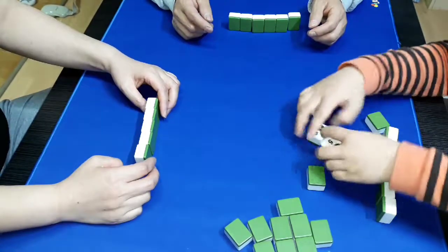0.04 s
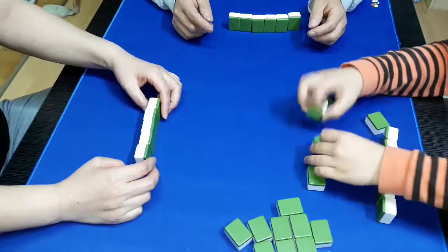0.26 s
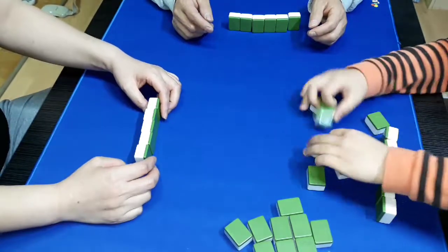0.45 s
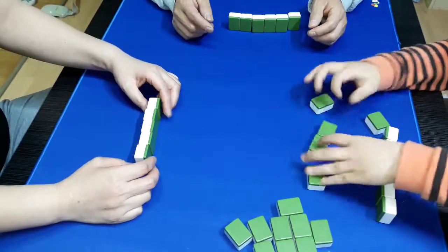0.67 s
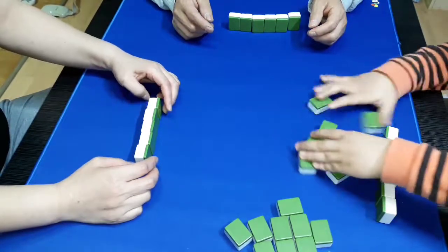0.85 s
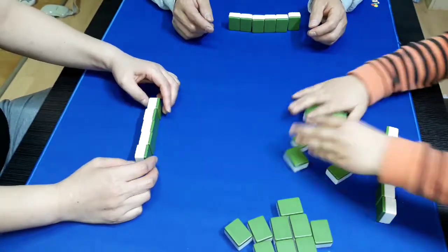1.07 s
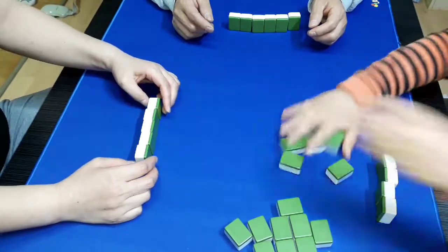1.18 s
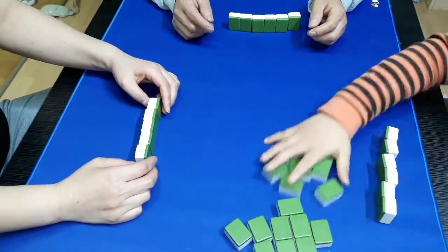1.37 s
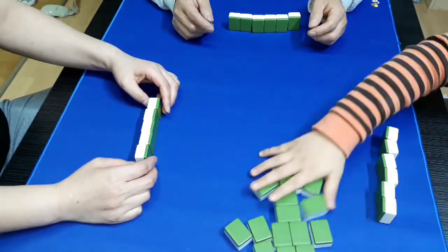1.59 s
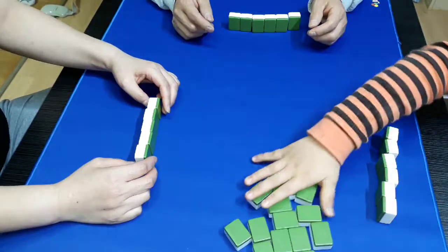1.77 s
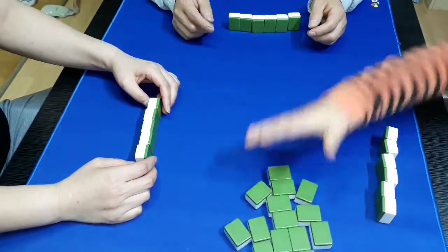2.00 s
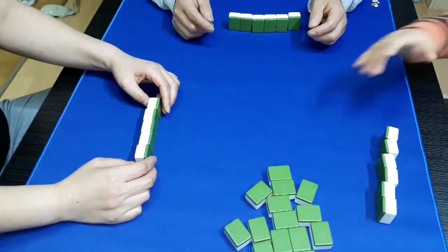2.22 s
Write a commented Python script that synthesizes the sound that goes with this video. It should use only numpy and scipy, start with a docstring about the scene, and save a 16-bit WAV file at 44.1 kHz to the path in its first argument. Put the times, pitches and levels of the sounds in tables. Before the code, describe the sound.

Hard game tiles clack together and land with dull thumps on a table mat, then are swept into a pile with a brief scraping rattle. Sliding hands add a soft rumble, heard close in a small, faintly humming room.

```python
"""Hard game tiles clack and thump as they are turned over, pushed together and swept across a table.
Tiles ring briefly when they hit each other and land with a dull thump on the mat that covers the top.
Sliding hands make the table rumble and the cloth hiss, and the swept pile scrapes and rattles.
The small room hums faintly and adds a short echo to each hit."""
import sys
import numpy as np
from scipy import signal
from scipy.fft import rfft, irfft
from scipy.io import wavfile
from scipy.ndimage import uniform_filter1d

SR = 44100
rng = np.random.default_rng(int(sys.argv[2]) if len(sys.argv) > 2 else 0)


def bounce(signal):
    """Save signal as a 16-bit WAV file at the path given by the first command-line argument."""
    frames = np.transpose(np.atleast_2d(signal))
    limited = np.clip(frames, -1, 1)
    pcm = np.round(limited * 32767).astype(np.int16)
    wavfile.write(sys.argv[1], SR, pcm)


N = 99225
TIME = np.arange(N) / SR

# The tones a tile rings with. Each row: pitch in Hz, level in dB, seconds to fade by 60 dB (called t60).
TILE_TONES = [(1750, -18.5, .005), (2200, -7.5, .009), (2850, -1.5, 0.0048), (3480, -5, .005),
              (4362, 3.5, 0.0093), (4554, 0, 0.011), (4970, -6.5, 0.0068), (6180, -5.5, 0.0027),
              (7000, -10.5, .007), (8450, -5.5, 0.0075)]


def from_db(db):
    """Turn decibels into a number to multiply by."""
    return 10 ** (np.asarray(db) / 20)


def same_energy(x, model):
    """Scale x to carry as much energy as model."""
    return x * np.sqrt(np.sum(model ** 2) / (np.sum(x ** 2) + 1e-20))


def at_hz(points, hz):
    """Read between the rows of a table, giving each octave equal space."""
    f, value = np.transpose(points)
    return np.interp(np.log(np.maximum(hz, 1)), np.log(f), value)


def level_curve(points):
    """Loudness over time, from rows of seconds and dB."""
    return from_db(np.interp(TIME, *np.transpose(points)))


def filtered(x, hz, kind, order=2):
    """Keep the lows, the highs or a band; a higher order cuts more steeply."""
    return signal.sosfilt(signal.butter(order, hz, kind, fs=SR, output="sos"), x)


def dying(t, t60):
    """A fade that is 60 dB down after t60 seconds."""
    return np.exp(-np.log(1000) * t / t60)


def noise(colour):
    """Steady noise with average power 1, shaped by rows of Hz and dB."""
    gains = from_db(at_hz(colour, np.fft.rfftfreq(N, 1 / SR)))
    x = irfft(rfft(rng.standard_normal(N)) * gains, N)
    return x / np.sqrt(np.mean(x ** 2) + 1e-20)


def burst(t, band_hz, t60, order=2):
    """A short, fading puff of noise within a band."""
    return filtered(rng.standard_normal(len(t)) * dying(t, t60), band_hz, "band", order)


def pulse(t, hz):
    """One push and rebound, strongest around hz; it peaks after 1 / hz seconds."""
    u = (np.pi * (hz * t - 1)) ** 2
    return (1 - 2 * u) * np.exp(-u)


def ring(t, tones, detune, uneven_db):
    """A struck object rings with fading tones, whose tuning and strength can vary from hit to hit."""
    out = 0
    for k, (hz, db, t60) in enumerate(tones):
        tuning, strength = rng.standard_normal(2)
        wave = np.sin(2 * np.pi * hz * (1 + detune * tuning) * t)
        out = out + (-1) ** k * from_db(db + uneven_db * strength) * wave * dying(t, t60)
    return out / np.abs(out).max()


def in_room(hit, room_db):
    """The room follows a hit with a few quick echoes and a soft tail, different for each spot."""
    # Echoes off nearby surfaces. Each row: delay in seconds, level in dB.
    echoes = [(.0062, -14), (0.0116, -24), (0.0215, -27)]
    # How long the room rings. Each row: frequency in Hz, seconds to fade by 60 dB.
    fade_times = [(150, 0.42), (400, 0.29), (1000, 0.42), (2800, 0.29), (7000, 0.29), (12000, 0.24)]
    # The tone of the tail. Each row: frequency in Hz, level in dB.
    colour = [(100, 0), (400, -2.5), (1000, -3.5), (2500, 2), (4500, -2.5), (8000, -1.5), (11000, -3.5),
              (15000, 3.5)]
    t, build_s = TIME[:2 ** 15], 0.0067
    hz = np.fft.rfftfreq(len(t), 1 / SR)
    spectrum = rfft(rng.standard_normal(len(t))) * from_db(at_hz(colour, hz))
    centres, tail = [f for f, _ in fade_times], 0
    for share, (_, t60) in zip(np.eye(len(centres)), fade_times):
        band = irfft(spectrum * at_hz(list(zip(centres, share)), hz), len(t))
        tail = tail + band * dying(t, t60)
    tail = tail * (1 - np.exp(-t / build_s))
    response = tail / np.sqrt(np.sum(tail ** 2))
    for delay_s, db in echoes:
        response[int(delay_s * SR)] += from_db(db)
    direct = t == 0
    return signal.fftconvolve(hit, direct + from_db(room_db) * response)


def add(track, s, sound):
    """Mix a sound in, starting at s seconds."""
    i = max(int(s * SR), 0)
    track[i:i + len(sound)] += sound[:max(N - i, 0)]


def room_hum():
    """The room hums with a faint, steady, low noise."""
    # The tone of the hum. Each row: frequency in Hz, level in dB.
    colour = [(25, -24.5), (50, -20), (100, -2.5), (155, 3), (230, 1), (400, -5), (600, -11.5), (780, -8.5),
              (1100, -28), (2000, -36), (4000, -39.5), (10000, -41.5), (15500, -39.5)]
    return from_db(-55) * noise(colour)


def cloth_hiss():
    """The cloth hisses softly as hands slide over it."""
    # How loud the hiss is. Each row: time in seconds, level in dB.
    levels = [(0, -101), (.2, -92), (.28, -69.5), (.65, -64.5), (.85, -73.5), (1.6, -60.5), (1.7, -72),
              (1.95, -71.5), (2.05, -75.5), (2.25, -74.5)]
    # The tone of the hiss. Each row: frequency in Hz, level in dB.
    colour = [(1000, 12), (3000, 1), (5500, 4.5), (7000, 3), (8300, 10), (9800, -20.5), (15000, -17.5)]
    return level_curve(levels) * noise(colour)


def table_rumble():
    """Each slide of a hand makes a rumble swell and fade around the table's lowest tone."""
    # Hand slides. Each row: peak time in seconds, level in dB, rise in seconds, fall in seconds.
    slides = [(0.559, -46, 0.035, 0.035), (.67, -42, 0.035, 0.093), (.76, -50.5, 0.025, 0.043),
              (.955, -40.5, 0.025, 0.056), (1.15, -52, 0.019, 0.064), (1.385, -47, 0.037, 0.047),
              (1.89, -43.5, 0.037, 0.067), (2.061, -47, .025, .05)]
    # The tone of the rumble. Each row: frequency in Hz, level in dB.
    colour = [(40, -33.5), (90, -21.5), (130, -1), (160, 5.5), (200, -5), (280, -13), (500, -28.5),
              (1000, -51.5), (4000, -60)]
    power = 0
    for s, db, rise_s, fall_s in slides:
        age = TIME - s
        swell = np.exp(-np.where(age < 0, (age / rise_s) ** 2 / 2, age / fall_s))
        power = power + (from_db(db) * swell) ** 2
    friction = noise(colour)
    wobble = np.sqrt(uniform_filter1d(friction ** 2, size=1500) + 1e-6)
    return np.sqrt(power) * friction / wobble   # dividing evens out the noise's own ups and downs


def swept_pile():
    """Swept tiles scrape over the mat and jostle with many small ticks."""
    # How hard the pile is swept. Each row: time in seconds, level in dB.
    sweep = [(1.28, -78), (1.34, -47), (1.40, -37.5), (1.47, -38.5), (1.56, -70), (1.63, -32.5),
             (1.67, -54), (1.76, -58), (1.86, -89.5)]
    # The tone of the scrape. Each row: frequency in Hz, level in dB.
    colour = [(100, -13.5), (300, -2.5), (540, 18.5), (800, -15), (1300, 6.5), (2000, -6.5), (3800, 8),
              (6000, -38.5), (12000, -36)]
    ticks_per_s, tile_count = 220, 6
    ticks, t = np.zeros(N), TIME[:SR // 50]
    scrape = from_db(-11.5) * noise(colour)
    bumps = (rng.random(N) < ticks_per_s / SR) * rng.standard_normal(N)
    which_tile = rng.integers(0, tile_count, N)
    for k in range(tile_count):
        tile = ring(t, TILE_TONES, detune=.06, uneven_db=3)
        ticks += signal.fftconvolve(bumps * (which_tile == k), tile)[:N]
    rattle = from_db(-26) * filtered(ticks, 3500, "low")
    started = TIME > sweep[0][0]
    return level_curve(sweep) * started * (scrape + rattle)


def pile_slap():
    """A tile slaps flat into the packed pile, which rings lower, as one heavier body."""
    # The slap. Each row: start in seconds, level in dB, room echo in dB.
    slaps = [(1.511, -11, -2)]
    # The pile's tones. Each row: pitch in Hz, level in dB, seconds to fade by 60 dB.
    pile_tones = [(984, -6, 0.035), (1233, -0.5, 0.015), (2125, -7.5, 0.027), (2400, 1, 0.015),
                  (2663, -7.5, 0.02), (3373, -3, 0.02), (4370, 3.5, .012)]
    out, t = np.zeros(N), TIME[:SR // 12]
    rise = 1 - np.exp(-t / 0.0015)   # the blow spreads from tile to tile
    for s, db, room_db in slaps:
        pile = ring(t, pile_tones, detune=0, uneven_db=0)
        grit = from_db(-5) * same_energy(burst(t, band_hz=(630, 4480), t60=.025, order=3), pile)
        slap = same_energy((pile + grit) * rise, pile)
        add(out, s, from_db(db) * in_room(slap, room_db))
    return out


def mat_thumps():
    """The springy mat softens each landing to one push; the tile quivers and the table rings low."""
    # A tile or finger lands. Each row: peak time in seconds, level in dB, push pitch in Hz,
    # table ring in dB, quiver pitch in Hz, quiver in dB, room echo in dB.
    landings = [(0.211, -29, 220, -2, 203, -14, -9), (0.2185, -19, 614, -2, 790, 1, -2.5),
                (0.2263, -28, 395, -13, 360, 11.5, -7), (0.2384, -20.5, 364, -18, 366, -5, -0.5),
                (0.3514, -17, 605, -0.5, 175, -3, -3.5), (0.3687, -28, 417, 0, 293, 0.5, -12.5),
                (0.389, -23.5, 266, -24, 157, -1, 6.5), (0.4062, -15.5, 464, 1, 680, -2.5, -0.5),
                (0.4108, -20.5, 335, -8, 167, -1, -8), (.4137, -16.5, 504, -10, 410, -6, -11),
                (0.4181, -19, 454, -21, 290, -5, -2), (.431, -34.5, 385, -7, 460, -3, -1),
                (0.4866, -16.5, 562, 0.5, 700, -5, -4), (0.4909, -16.5, 550, -9, 303, -1.5, 1),
                (0.4984, -25.5, 362, -3.5, 185, -4.5, 1.5), (0.5545, -32.5, 432, 0, 195, -2, 1.5),
                (0.735, -35.5, 560, 2, 344, 3.5, 3.5), (1.5049, -30.5, 480, -7, 560, -10, -1.5),
                (1.515, -23, 605, -0.5, 214, -5.5, -0.5)]
    # The padded table's tones. Each row: pitch in Hz, level in dB, seconds to fade by 60 dB.
    table_tones = [(161.8, -13.5, 0.13), (259, -4.5, 0.077), (320, -7.5, 0.073), (410, 0.5, 0.12),
                   (607.5, -12, 0.05), (700, -3, 0.021), (844, -6.5, 0.036), (1624, -14, 0.011)]
    quiver_cycles, table_low_hz = 16, 69.6
    out, t = np.zeros(N), TIME[:SR // 5]
    for s, db, push_hz, ring_db, quiver_hz, quiver_db, room_db in landings:
        push = pulse(t, push_hz)
        top = from_db(ring_db) * same_energy(ring(t, table_tones, detune=0.018, uneven_db=2.5), push)
        crush = from_db(-10.5) * same_energy(burst(t, band_hz=(80, 1400), t60=0.014), push)
        quiver = np.sin(2 * np.pi * quiver_hz * t) * dying(t, quiver_cycles / quiver_hz)
        quiver = from_db(quiver_db) * same_energy(quiver, push)
        tap = from_db(-19.5) * same_energy(burst(t, band_hz=(870, 1470), t60=.007), push)
        tap *= (push_hz / 490) ** 2   # a quicker push taps louder
        pressed = 1 - np.exp(-(push_hz * t) ** 2)   # the ringing builds while the mat gives way
        body = filtered(push + pressed * (top + crush + quiver), table_low_hz, "high")
        add(out, s - 1 / push_hz, from_db(db) * in_room(body + tap, room_db))
    return out


def tile_clacks():
    """Tiles crack and ring as they meet, knock when pressed to the table and snap when edges touch."""
    # Tile hits tile. Each row: start in seconds, level in dB, treble limit in Hz,
    # low knock in dB, high snap in dB, room echo in dB.
    hits = [(0.351, -15.5, 9000, -0.5, -43.5, -6), (0.3555, -21, 8900, 4, -27, -1.5),
            (0.5092, -29, 7000, -32, -38, -2.5), (0.5289, -33.5, 9000, -15, -39, -19),
            (0.568, -43.5, 7000, -19, -27, -3.5), (0.7388, -42.5, 7000, -5, -40, -3.5),
            (0.798, -30.5, 9000, -20.5, -41, 0), (.909, -16, 7500, -25.5, -42.5, 2.5),
            (0.9269, -25.5, 7000, -15.5, -27, -1), (0.9433, -22.5, 7000, -16, -32, -9),
            (1.036, -26, 7000, -36, -34.5, -4), (1.099, -35, 4500, -29, -35, -3.5),
            (1.1437, -10.5, 8450, -46.5, -29, -9), (1.1456, -14.5, 6040, -21.5, -32.5, 0.5),
            (1.171, -14.5, 7500, -17, -20.5, 1), (1.1729, -9, 7000, -32.5, -22.5, -2.5),
            (1.3227, -21, 7870, -19.5, -17.5, -17.5), (1.326, -22.5, 8000, -21, -15.5, -0.5),
            (1.371, -18.5, 8000, -14.5, -10.5, -8.5), (1.376, -19.5, 6500, -27, -19.5, -18),
            (1.3838, -26.5, 5500, -7, -16.5, -17), (1.3914, -19, 5500, -13, -32, -1),
            (1.4309, -22, 7000, -10.5, -16, -4), (1.435, -19, 3700, -17.5, -34, -7),
            (1.4572, -46.5, 4500, 9, -20, 5), (1.624, -27, 4970, -34, -22, -10),
            (1.633, -30, 4000, -8.5, -35, -1), (1.675, -42.5, 3500, -12, -28, -11),
            (1.7399, -37, 6540, -18, -42, -3), (1.775, -25.5, 7000, -10, -13.5, -2),
            (1.78, -27.5, 5840, -27, -37, -16), (1.9951, -62, 9000, -12, 14.5, -7)]
    out, t = np.zeros(N), TIME[:SR // 25]
    for s, db, treble_hz, knock_db, snap_db, room_db in hits:
        tile = ring(t, TILE_TONES, detune=.028, uneven_db=3.5)
        # Two faces chatter as they settle, and each tiny touch rings the tile again.
        touches = burst(t, band_hz=(1874, 8900), t60=0.019, order=4)
        rung = from_db(-8.5) * same_energy(signal.fftconvolve(touches, tile)[:len(t)], touches)
        chatter = from_db(1.5) * same_energy(touches + rung, tile)
        crack = from_db(1.5) * same_energy(pulse(t, hz=4440), tile)
        roughness = from_db(1.8 * min(db + 28, 0))   # hits below -28 dB ring more purely
        face = filtered(tile + roughness * (chatter + crack), treble_hz, "low", order=3)
        face = filtered(face, 8900, "low", order=8)
        face = filtered(face, 1500, "high")   # a small tile gives off little bass
        knock = from_db(knock_db) * same_energy(burst(t, band_hz=(650, 1880), t60=.014), tile)
        snap = from_db(snap_db) * same_energy(burst(t, band_hz=(6900, 11000), t60=0.0021, order=3), tile)
        add(out, s, from_db(db) * in_room(same_energy(face, tile) + knock + snap, room_db))
    return out


def scene():
    """Mix the room, cloth, table and tiles into one channel."""
    background = room_hum() + cloth_hiss() + table_rumble()
    return (background + tile_clacks() + pile_slap() + mat_thumps() + swept_pile())[None]


def record(dry):
    """Cut the very highest treble steeply."""
    cutoff_hz = 15800
    return signal.sosfilt(signal.ellip(10, .1, 70, cutoff_hz, fs=SR, output="sos"), dry)


dry = scene()
out = record(dry)
bounce(out)
```